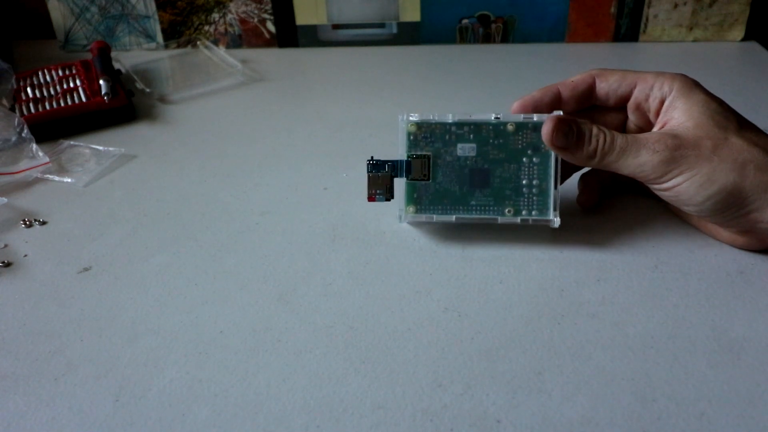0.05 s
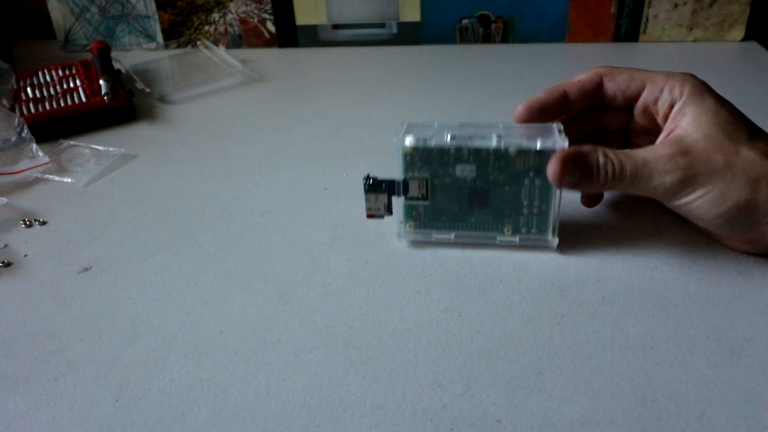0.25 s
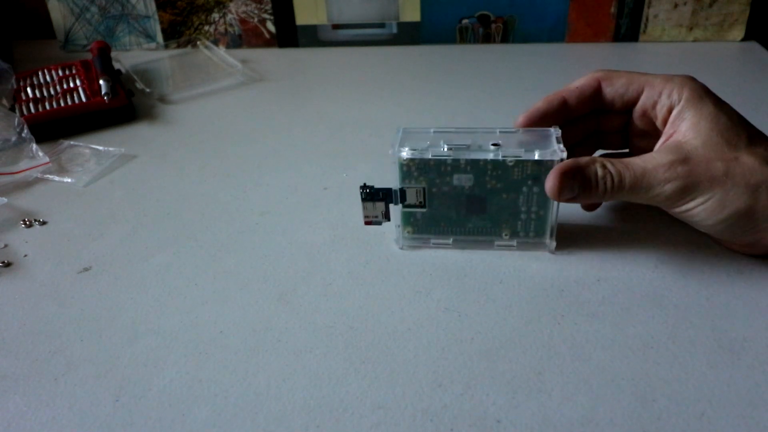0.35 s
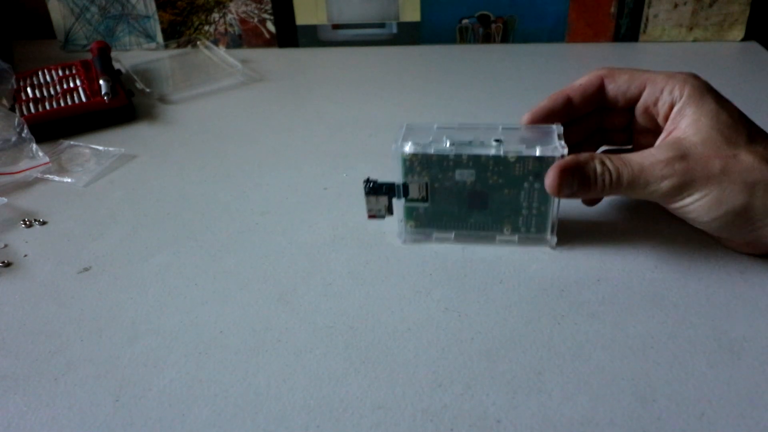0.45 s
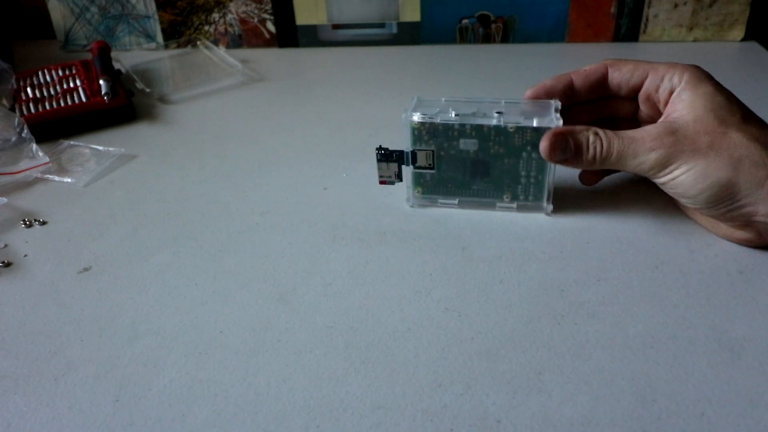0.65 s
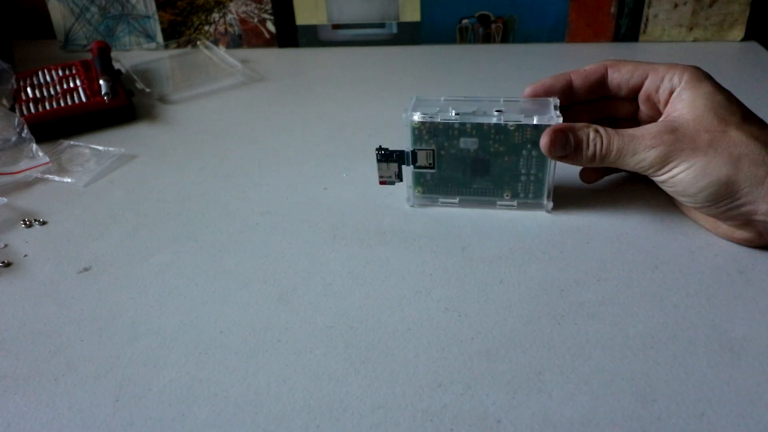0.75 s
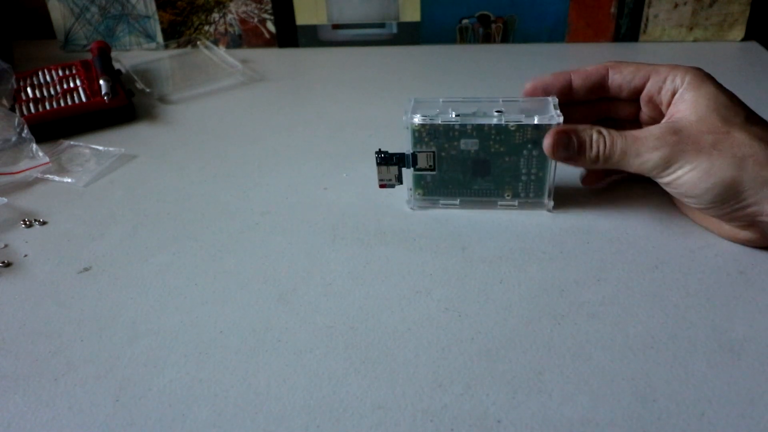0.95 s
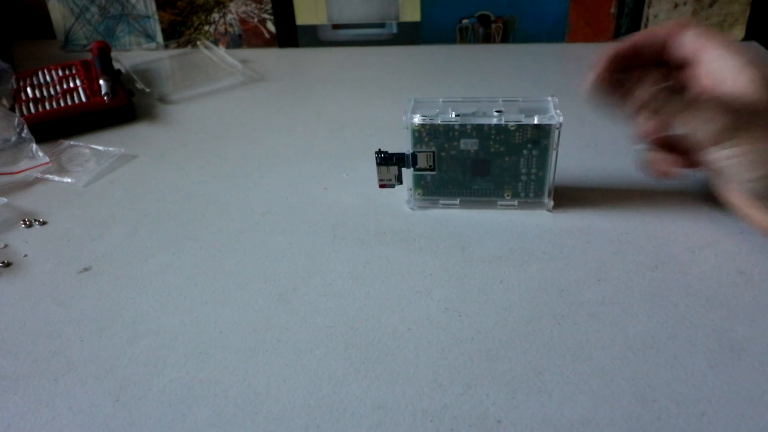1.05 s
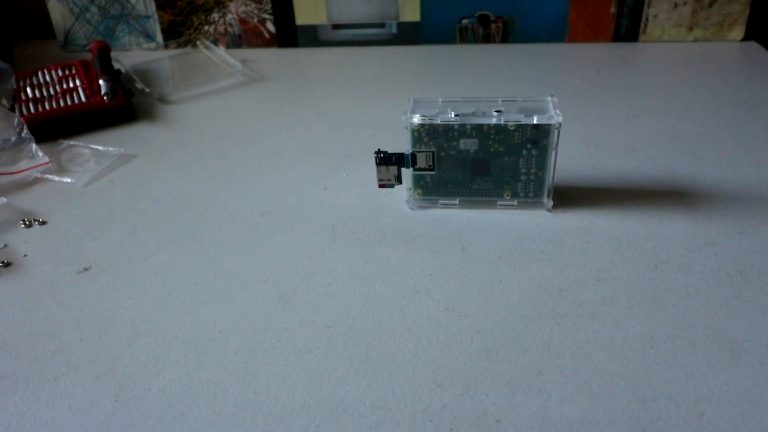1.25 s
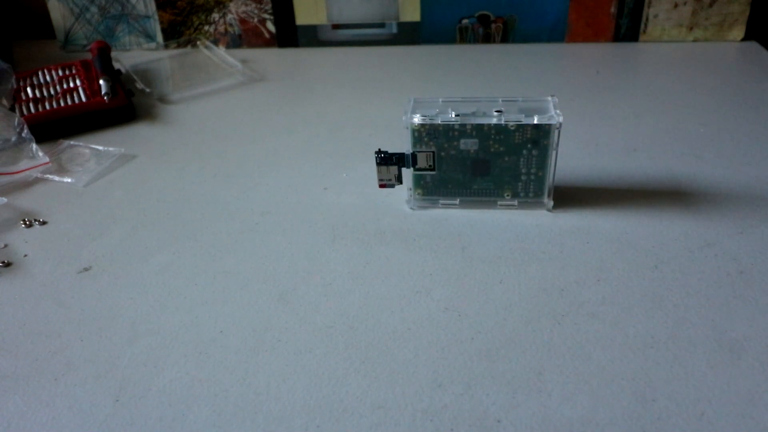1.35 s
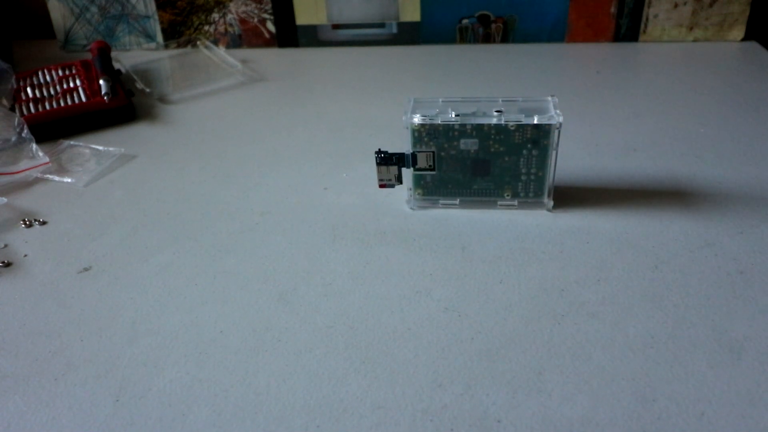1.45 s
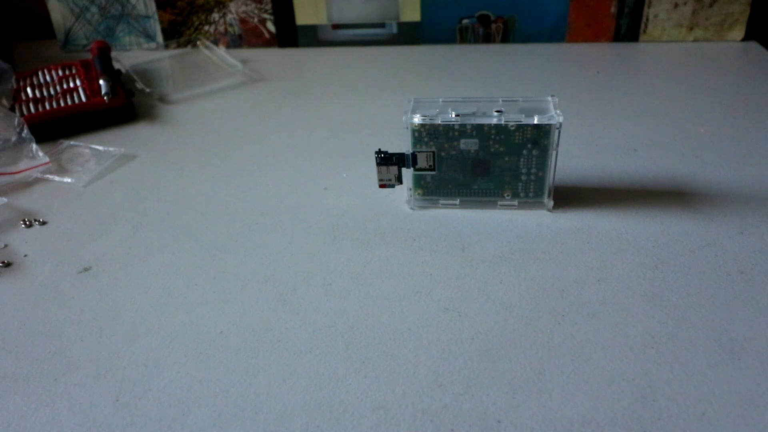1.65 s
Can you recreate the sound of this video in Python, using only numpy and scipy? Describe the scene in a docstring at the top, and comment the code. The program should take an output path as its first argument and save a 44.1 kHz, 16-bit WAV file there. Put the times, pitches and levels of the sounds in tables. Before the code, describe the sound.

A small plastic case is set on a table with soft knocks at about 0.2 and 0.4 seconds. From 0.5 to 0.75 it slides in a juddering scrape with sharper knocks, then settles. Fingers brush off it with a light click at 1.1 seconds and a fainter one at 1.2. The sound is close, in a quiet room with low hum, hiss and faint rapid electrical ticking throughout.

```python
"""Plastic case on a table

Close to the microphone in a quiet room, a small plastic case is stood on a table, rocks on its corners,
is pushed back across the top and let go. Knocks and the stick and slip of its edge ring the table top
and the thin shell; fingers brush off it with a click. Under it lie room tone, mains hum, microphone
hiss and a faint regular tick of electrical interference."""
import sys
import numpy as np
from scipy import signal
from scipy.fft import rfft, irfft
from scipy.io import wavfile

SR = 44100
rng = np.random.default_rng(int(sys.argv[2]) if len(sys.argv) > 2 else 0)


def log_audio(samples):
    """Write samples as a 16-bit WAV file to the path given in sys.argv[1]."""
    # one column per channel
    frames = np.atleast_2d(samples).T
    # limit to full scale, then quantise
    limited = np.clip(frames, -1, 1)
    pcm = np.round(limited * 32767).astype(np.int16)
    wavfile.write(sys.argv[1], SR, pcm)


N = 74970

# tone of the still room: f/Hz, level/dB
ROOM_COLOUR = [(20, -18), (50, 8), (90, -12.5), (135, 3), (220, -1.5), (350, -8), (700, -11), (1500, -15.5),
               (4000, -22), (16000, -36.5)]
# modes of the table top: f/Hz, level/dB, t60/s
TABLE_MODES = [(130.7, -5.5, 0.24), (164.3, 2.5, 0.075), (183.9, -0.5, 0.12), (208.1, 0, .13),
               (238, -15, 0.039), (321.8, -2.5, 0.097), (392.5, -15.5, 0.18), (427, -17, 0.1),
               (479, -18.5, 0.1), (552, -17, 0.073), (604, -9, 0.065), (715, -4.5, 0.041),
               (758, -11.5, 0.082), (910, -36, 0.057), (1060, -20.5, 0.18)]
# modes of the plastic shell: f/Hz, level/dB, t60/s
SHELL_MODES = [(1350, 3, 0.012), (1710, 0, 0.01), (2147, -7.5, 0.02), (2420, -9.5, 0.027), (3203, 3, 0.015),
               (3450, 1, 0.024), (3520, -12, 0.028), (3590, -14, 0.0087), (3980, -17, .018),
               (4900, -21, 0.013), (5340, -13.5, 0.022)]
# fingers brushing off the shell: t/s, level/dB, attack/s, t60/s
BRUSHES = [(1.076, -44, 0.019, 0.25), (1.113, -46.5, 0.0033, 0.26), (1.228, -51, 0.0013, 0.16)]
# skin on plastic: f/Hz, level/dB
BRUSH_COLOUR = [(100, 6), (200, 3), (550, 2), (1000, -1), (1700, -3.5), (2600, -11.5), (3900, -6),
                (4800, -10), (5600, -13), (7500, -23), (11000, -19.5), (16000, -25)]
# clicks of the shell, relative levels: t/s, snap/dB, plastic ring/dB, hollow ring/dB
CLICKS = [(1.0889, -30.5, -32, -53), (1.1212, -41, -44, -45), (1.2294, -38.5, -54, -44),
          (1.242, -48, -62, -41)]
# snap of a click: f/Hz, level/dB
SNAP_COLOUR = [(300, 12), (800, -15), (2500, -2), (3900, 9.5), (4800, -1), (7500, -4), (11000, -2),
               (16000, -19)]
# knocks of the case on the table: t/s, table level/dB, contact/ms, shell level/dB
KNOCKS = [(0.1933, -25.5, 1.44, -41), (0.1991, -19.5, 3.33, -39.5), (0.2128, -17, 3.2, -56),
          (0.2226, -21.5, 2.4, -54), (0.362, -25.5, 4.2, -34.5), (0.3859, -17.5, 0.85, -40),
          (0.392, -33, 2.7, -48), (0.413, -27.5, 2, -56), (0.5501, -15, 1.24, -32),
          (0.6147, -29, 0.53, -21), (0.6291, -31, 3.7, -30), (.647, -22, 2.3, -32),
          (0.6597, -16.5, 1.5, -20.5), (.7335, -33.5, 5.8, -42), (0.7398, -17, 2.73, -50),
          (0.7449, -24, 3.2, -48.5), (.9945, -39, 3, -51), (1.1276, -39, 3.8, -54)]
# grit under the edge: f/Hz, level/dB
GRIT_COLOUR = [(150, -2.5), (400, -0.5), (700, -12), (1100, -5), (1350, 1.5), (1900, -13.5), (2700, -13),
               (3600, -20), (5500, -16.5), (7500, -24.5), (12000, -35.5), (16000, -32)]
# hard snags of the edge: t/s, relative level/dB
SNAGS = [(0.36, -50), (0.512, -47), (0.608, -31), (.631, -32.5), (.655, -37.5)]
# runs of steady stick and slip: t/s, length/s, f/Hz, level/dB
CHATTERS = [(.488, 0.014, 174.7, -21.5), (0.519, 0.042, 321.7, -15), (.6, 0.024, 601.4, -16.5),
            (.625, 0.038, 183.6, -16)]
# course of the slide, relative levels: t/s, deep judder/dB, scrape/dB, grit/dB
SLIDE_LEVELS = [(0.181, -68, -52, -64), (0.199, -60, -46, -54), (.23, -52, -55, -62.5),
                (.255, -46, -57, -76), (.29, -52, -72, -81), (.34, -44.5, -75, -66),
                (0.387, -30, -41, -47.5), (0.447, -51.5, -58, -80), (0.467, -28, -47, -51.5),
                (.505, -26.5, -44, -50), (.535, -21.5, -35, -38.5), (.572, -24.5, -24, -32),
                (.597, -23.5, -23.5, -36.5), (.618, -22.5, -27, -36.5), (0.656, -21.5, -27, -34),
                (.69, -25, -30, -46), (.724, -31, -38, -47), (0.735, -32, -34.5, -42),
                (0.756, -45, -48.5, -49), (0.781, -46.5, -55, -66), (.91, -49.5, -76, -78),
                (.95, -53, -68, -77), (1.0, -51.5, -50.5, -59.5), (1.05, -68, -63, -73)]

ROOM_DB, HUM_HZ, HUM_DB, HISS_DB, HISS_SIDE_DB = -57.5, 59.3, -57.5, -60, -3
TICK_FIRST_S, TICK_PERIOD_S, TICK_LENGTH_S, TICK_DB = 0.0208, 0.1024, 0.00211, -38.5
WALLS_DB, WALLS_T60_S = -19, 0.28
SNAP_T60_S, CLICK_SHELL_DB, CLICK_RING_HZ, CLICK_RING_T60_S = 0.01, -7.5, 3950, 0.023
HOLLOW_HZ, HOLLOW_T60_S = 917, 0.035
CRACK_DB, CRACK_T60_S = -7, 0.094
SNAG_T60_S, SNAG_LOW_HZ, SNAG_TOP_HZ = 0.0092, 3480, 5370
CATCHES_PER_S, CATCH_SPREAD_DB, CHATTER_JITTER = 1500, 3.5, 0.036
JUDDER_LOW_HZ, JUDDER_TOP_HZ, SCRAPE_LOW_HZ, SCRAPE_TOP_HZ = 45.6, 258, 325, 857
GRIT_DB, SLIDE_SHELL_DB = -3, -4
SHELL_TOP_HZ, RECORDER_TOP_HZ = 6100, 15600


def undb(db):
    """Decibels to gain."""
    return 10 ** (np.asarray(db) / 20)


def unit(x):
    """Scale to rms 1."""
    return x / np.sqrt(np.mean(x ** 2))


def unit_peak(x):
    """Scale to peak 1."""
    return x / np.abs(x).max()


def clock():
    """Time of every sample in seconds."""
    return np.arange(N) / SR


def fade(t60, hold=0):
    """Hold at 1, then decay by 60 dB in t60 seconds."""
    return np.exp(-np.log(1000) * np.maximum(clock() - hold, 0) / t60)


def curve(rows, column):
    """Gain along one dB column of a timed table, silent outside its span."""
    rows = np.array(rows)
    return undb(np.interp(clock(), rows[:, 0], rows[:, column], left=-150, right=-150))


def colour(x, points):
    """Causal filter through points of f/Hz, level/dB."""
    hz, db = np.array(points).T
    bins_hz = np.fft.rfftfreq(2 * N, 1 / SR)
    log_gain = np.interp(np.log(bins_hz + 1), np.log(hz), np.log(undb(db)))
    cepstrum = irfft(log_gain)[:N]
    cepstrum[1:] *= 2  # minimum phase
    return irfft(rfft(x, 2 * N) * np.exp(rfft(cepstrum, 2 * N)))[:N]


def cut(x, hz, kind, order=2):
    """Low-pass or high-pass."""
    return signal.sosfilt(signal.butter(order, hz, kind, fs=SR, output="sos"), x)


def through(x, response):
    """Drive a body that has this impulse response."""
    return signal.fftconvolve(x, response)[:N]


def ring(modes):
    """Impulse response of a set of modes, peak 1."""
    return unit_peak(sum(undb(db) * fade(t60) * np.cos(2 * np.pi * hz * clock())
                         for hz, db, t60 in modes))


def at(s, x):
    """Delay a sound by s seconds."""
    return np.concatenate([np.zeros(int(s * SR)), x])[:N]


def background():
    """Room rumble and mains hum in the centre, microphone hiss partly different left and right."""
    room, mid, side = rng.standard_normal((3, N))
    rumble = unit(colour(room, ROOM_COLOUR))
    hum = np.sqrt(2) * np.sin(2 * np.pi * HUM_HZ * clock())
    hiss = mid + undb(HISS_SIDE_DB) * side * np.array([[1], [-1]])
    return undb(ROOM_DB) * rumble + undb(HUM_DB) * hum + undb(HISS_DB) * hiss


def interference():
    """Short square dips of voltage tick on the microphone line about ten times a second."""
    dips = (clock() - TICK_FIRST_S) % TICK_PERIOD_S < TICK_LENGTH_S
    ticks = cut(-1.0 * dips, 70, "high")
    return undb(TICK_DB) * cut(ticks, 9200, "low", order=1)


def walls(direct):
    """Faint reflections from nearby walls reach the microphone from 6 ms after the direct sound."""
    tail = cut(rng.standard_normal(N), 5700, "low", order=1) * fade(WALLS_T60_S)
    response = at(0.006, tail)
    return undb(WALLS_DB) * through(direct, response / np.linalg.norm(response))


def fingers(shell):
    """Skin brushes off the case, and the freed shell clicks: a snap of noise and a short ring."""
    t = clock()
    touch = sum(at(s, undb(db) * np.minimum(t / attack, 1) * fade(t60, hold=attack))
                for s, db, attack, t60 in BRUSHES)
    out = touch * unit(colour(rng.standard_normal(N), BRUSH_COLOUR))
    hollow = fade(HOLLOW_T60_S) * np.sin(2 * np.pi * HOLLOW_HZ * t)
    ping = fade(CLICK_RING_T60_S) * np.sin(2 * np.pi * CLICK_RING_HZ * t)
    plastic = undb(CLICK_SHELL_DB) * shell + 0.23 * ping
    for s, snap_db, ring_db, hollow_db in CLICKS:
        snap = 0.67 * colour(rng.standard_normal(N) * fade(SNAP_T60_S), SNAP_COLOUR)
        out += at(s, undb(snap_db) * snap + undb(ring_db) * plastic + undb(hollow_db) * hollow)
    return out


def knocks(table, shell):
    """Each knock is a short push on the table top, a brief crack and a tap on the shell."""
    out = np.zeros(N)
    for s, table_db, contact_ms, shell_db in KNOCKS:
        push = np.sin(np.pi * np.minimum(clock() * 1000 / contact_ms, 1))  # longer contact, duller thud
        crack = unit_peak(colour(rng.standard_normal(N) * fade(CRACK_T60_S), GRIT_COLOUR))
        thud = unit_peak(through(push, table + undb(CRACK_DB) * crack))
        out += at(s, undb(table_db) * thud + undb(shell_db) * shell)
    return cut(out, 66, "high")


def snags():
    """Now and then the edge snags and lets go with a bright scratch."""
    spray = sum(at(s, undb(db) * rng.standard_normal(N) * fade(SNAG_T60_S)) for s, db in SNAGS)
    return 4 * cut(cut(spray, SNAG_LOW_HZ, "high"), SNAG_TOP_HZ, "low", order=5)


def chatter(table):
    """Short runs of nearly even slips make the table top sing."""
    out = np.zeros(N)
    for s, length, hz, db in CHATTERS:
        times = np.cumsum(1 + CHATTER_JITTER * rng.standard_normal(size=64)) / hz
        times = times[times < length]
        swell = np.sin(np.pi * times / length)
        slips = np.bincount((times * SR).astype(int), weights=swell, minlength=N)
        tone = cut(cut(through(slips, table), 1.26 * hz, "low"), 0.61 * hz, "high")
        out += at(s, undb(db) * unit_peak(tone))
    return out


def catches():
    """The edge catches and slips: random impulses of uneven size."""
    caught = rng.random(N) < CATCHES_PER_S / SR
    size_db = CATCH_SPREAD_DB * np.minimum(rng.exponential(size=N), 3)
    sign = rng.choice([-1, 1], N)
    return caught * sign * undb(size_db)


def slide(table, shell):
    """Catches of the sliding edge shake the table, rasp as grit and ring the shell."""
    edge = catches()

    def drive(gain, body):
        """The catches ring a body at an rms level that follows gain."""
        return through(gain * edge, body) / np.std(through(edge, body))

    judder_gain, scrape_gain, grit_gain = (curve(SLIDE_LEVELS, column) for column in (1, 2, 3))
    table_lows = cut(cut(table, JUDDER_TOP_HZ, "low", order=4), JUDDER_LOW_HZ, "high")
    table_mids = cut(cut(table, SCRAPE_LOW_HZ, "high", order=3), SCRAPE_TOP_HZ, "low", order=4)
    judder = drive(judder_gain, table_lows)
    scrape = drive(scrape_gain, table_mids)
    grit = undb(GRIT_DB) * grit_gain * unit(colour(edge, GRIT_COLOUR))
    shell_ring = undb(SLIDE_SHELL_DB) * drive(grit_gain, cut(shell, 1000, "high"))
    return judder + scrape + grit + shell_ring


def scene():
    """The case close up and dead centre, with the room faint behind it."""
    table = ring(TABLE_MODES)
    shell = cut(ring(SHELL_MODES), SHELL_TOP_HZ, "low", order=4)
    direct = knocks(table, shell) + slide(table, shell) + chatter(table) + snags() + fingers(shell)
    return direct + walls(direct) + interference() + background()


def record(dry):
    """The recorder cuts the top treble steeply."""
    return signal.sosfilt(signal.ellip(10, 0.1, 80, RECORDER_TOP_HZ, fs=SR, output="sos"), dry)


dry = scene()
out = record(dry)
log_audio(out)
```